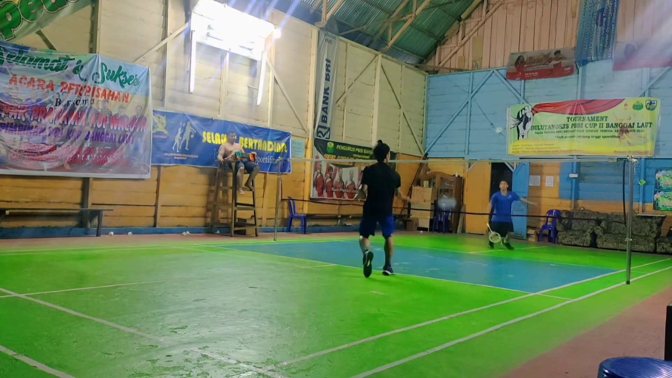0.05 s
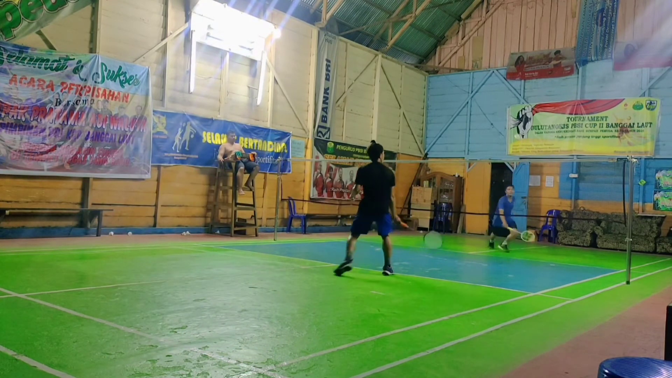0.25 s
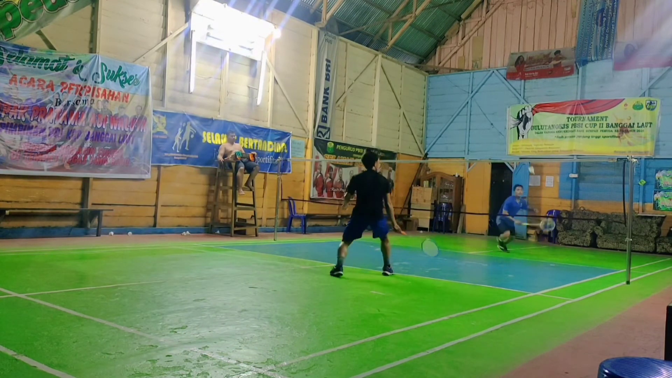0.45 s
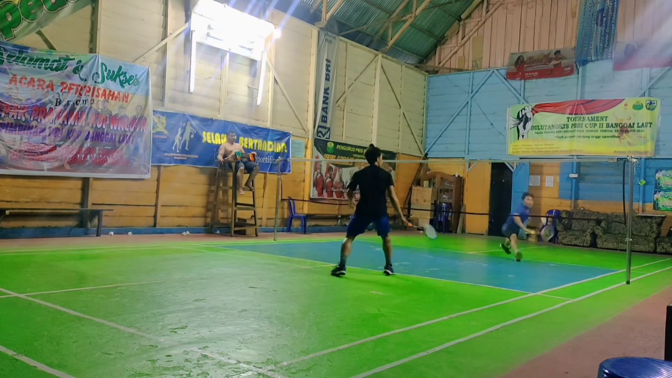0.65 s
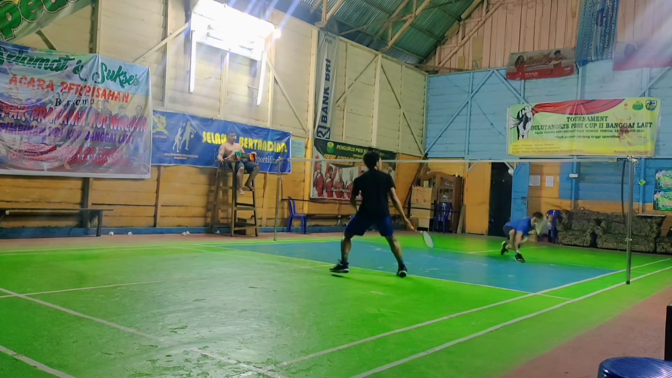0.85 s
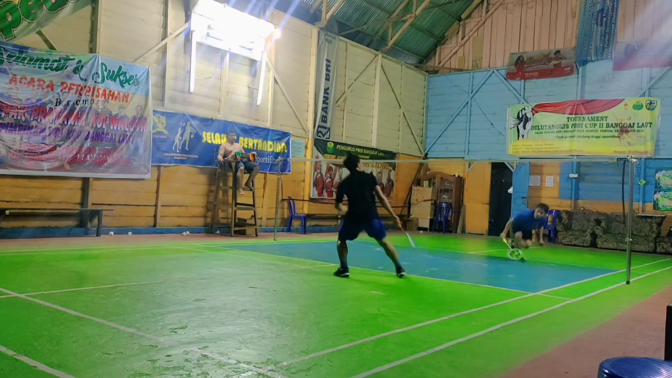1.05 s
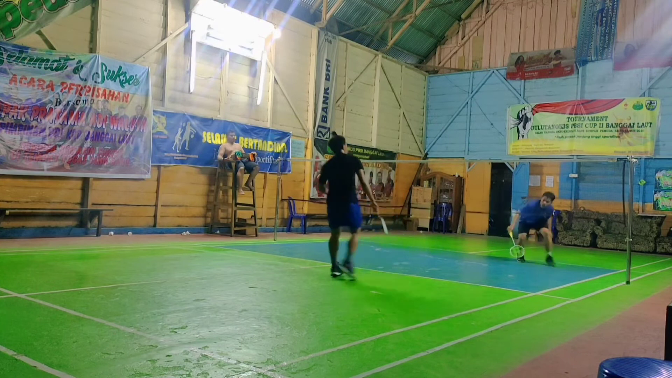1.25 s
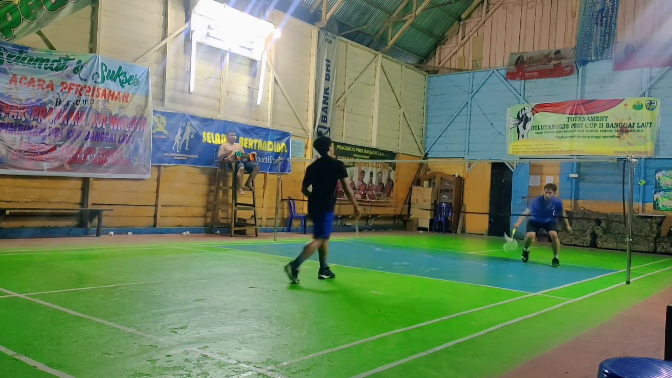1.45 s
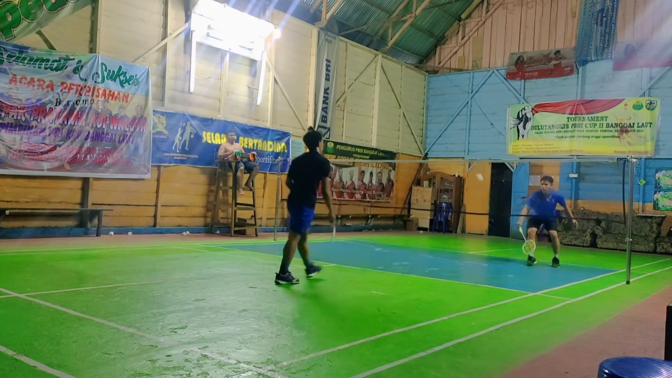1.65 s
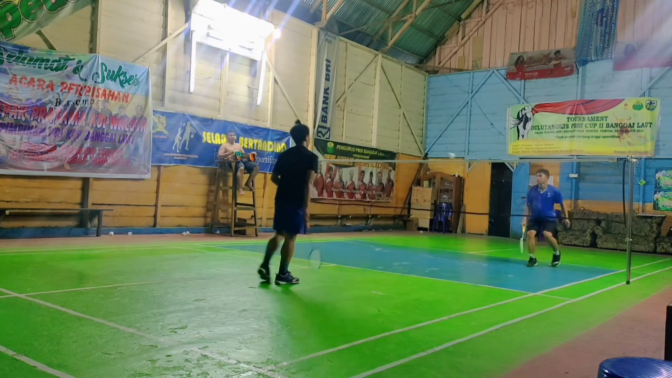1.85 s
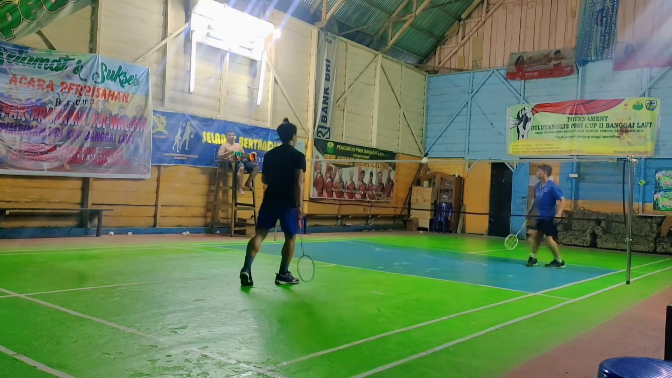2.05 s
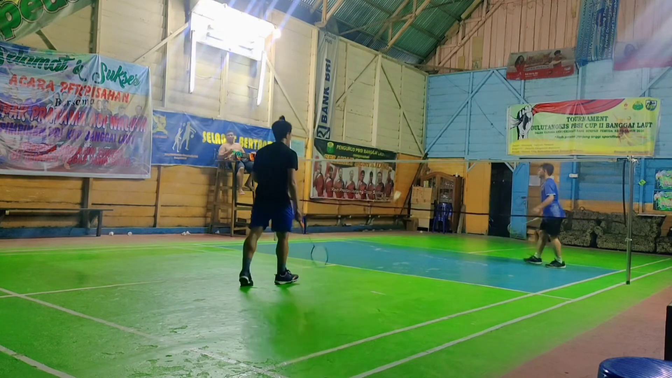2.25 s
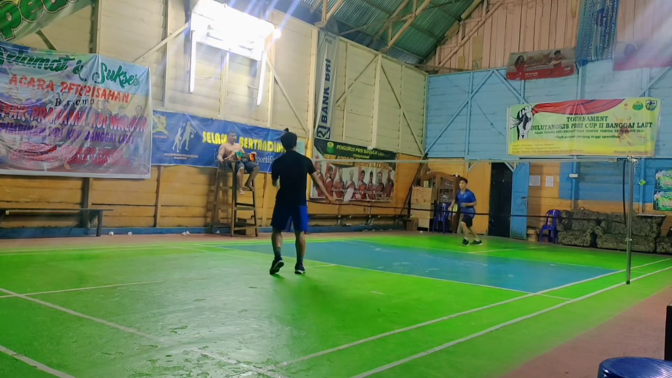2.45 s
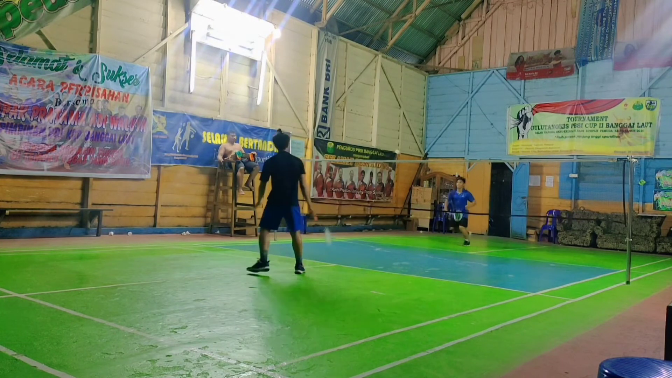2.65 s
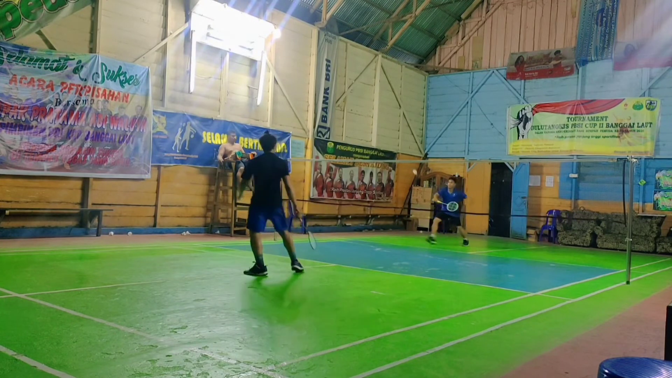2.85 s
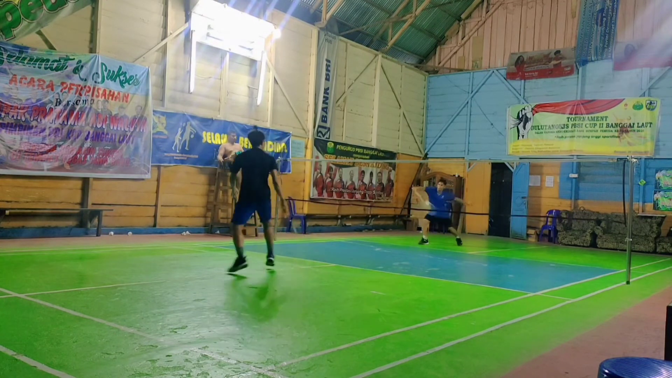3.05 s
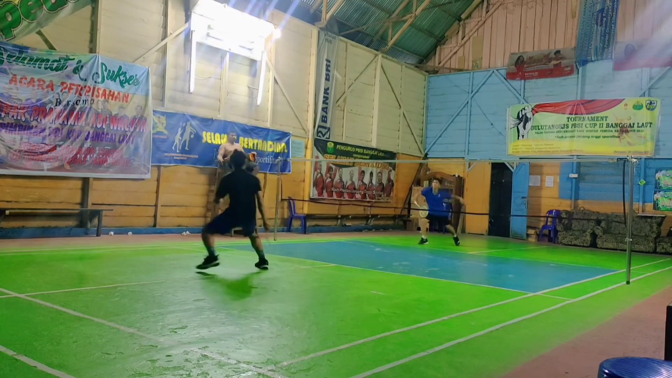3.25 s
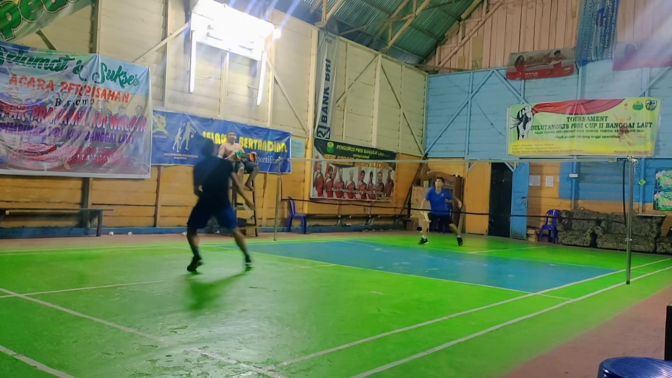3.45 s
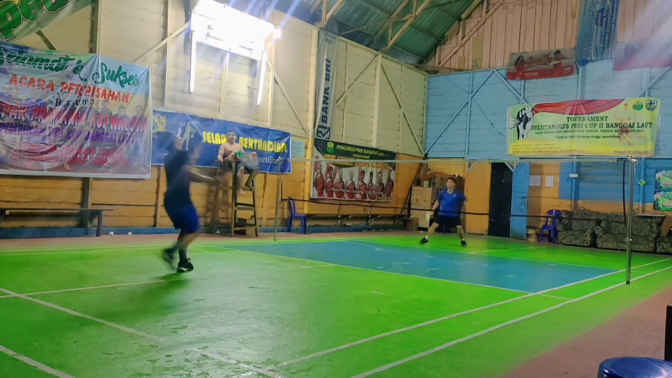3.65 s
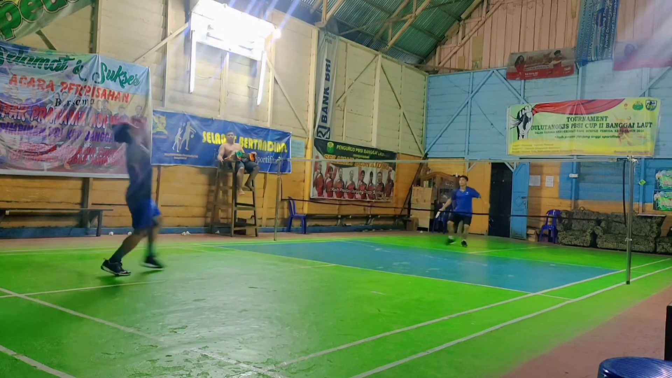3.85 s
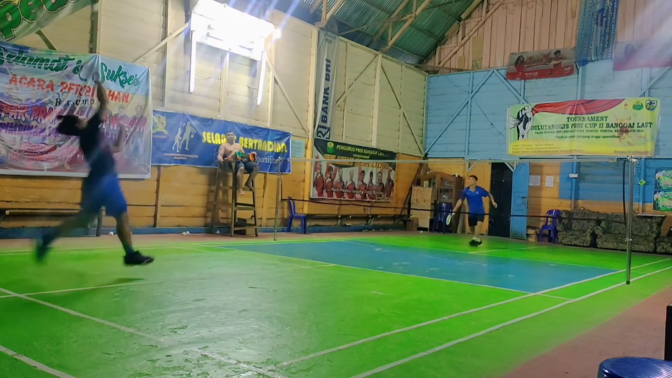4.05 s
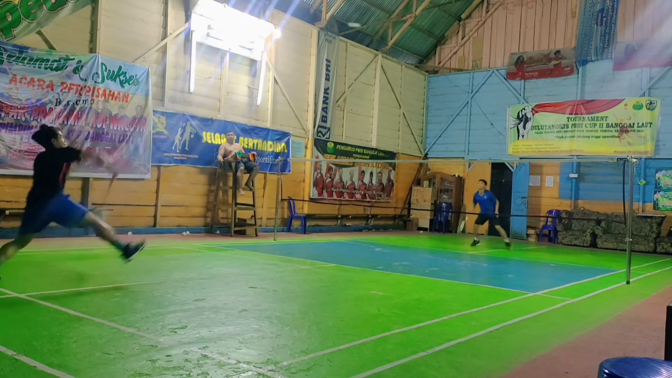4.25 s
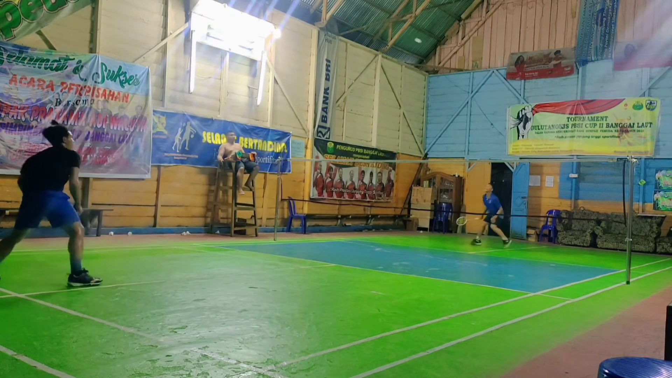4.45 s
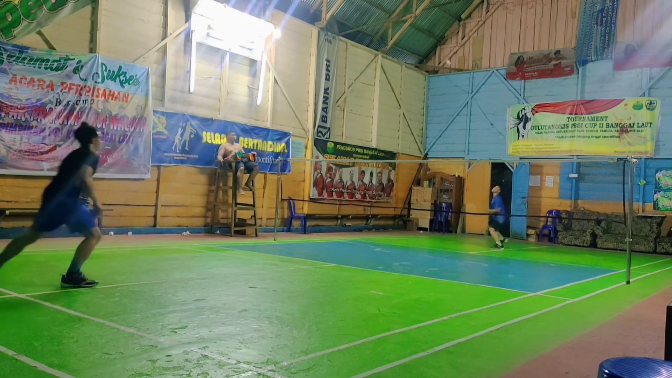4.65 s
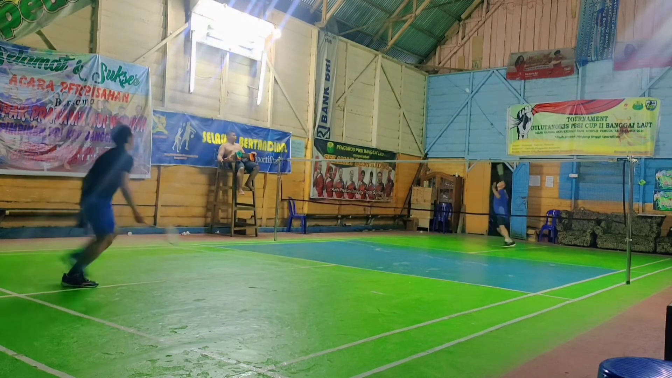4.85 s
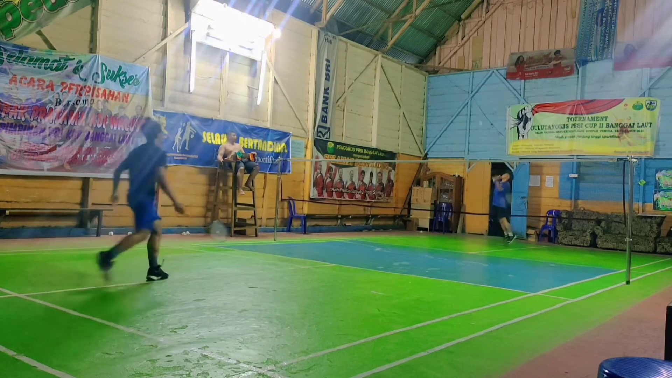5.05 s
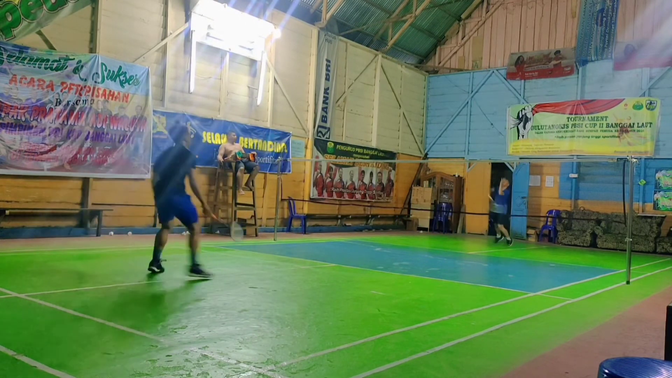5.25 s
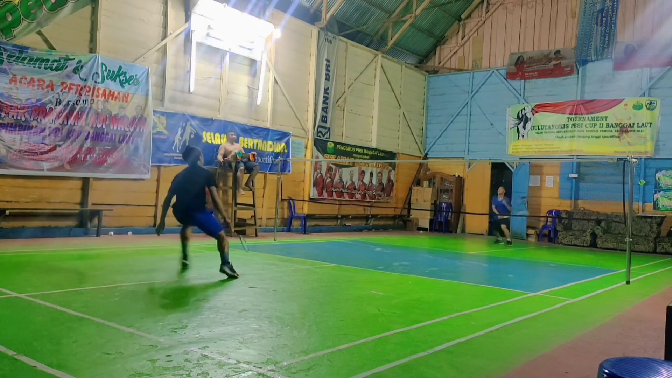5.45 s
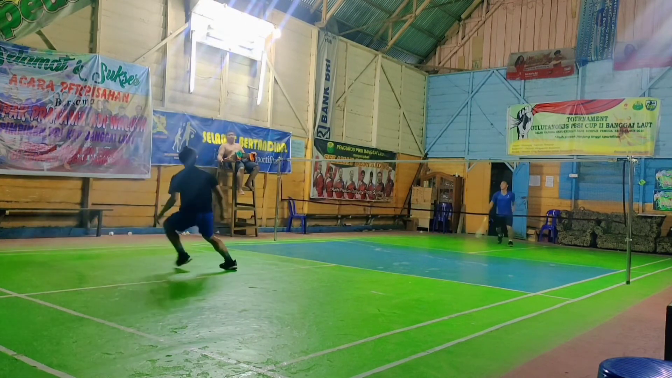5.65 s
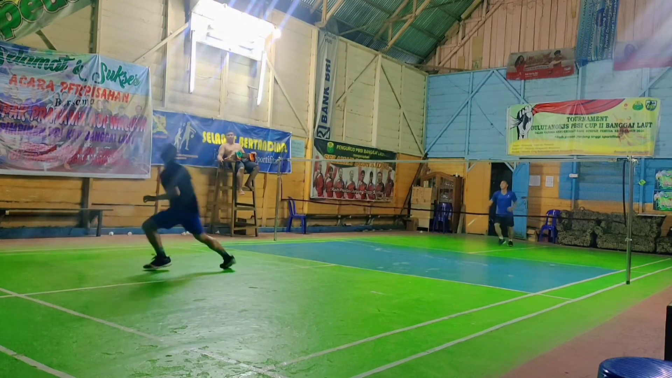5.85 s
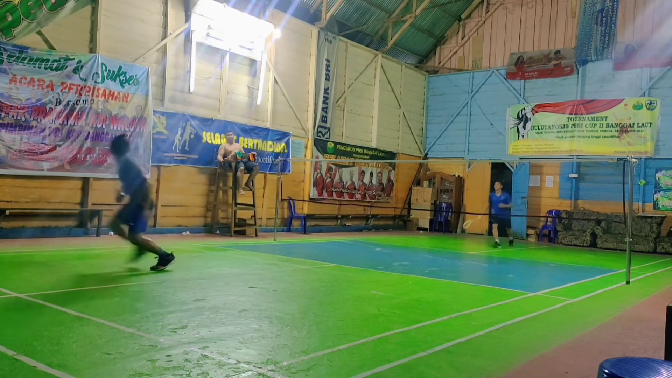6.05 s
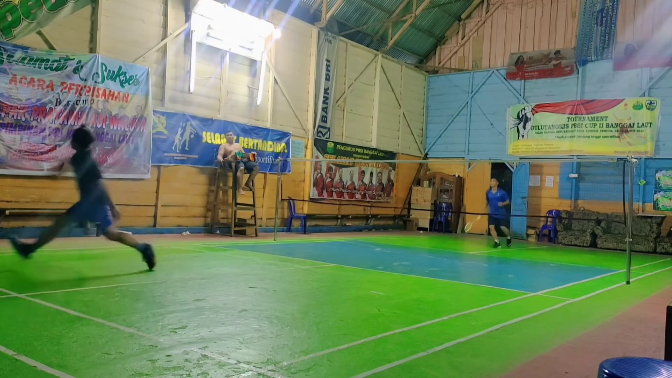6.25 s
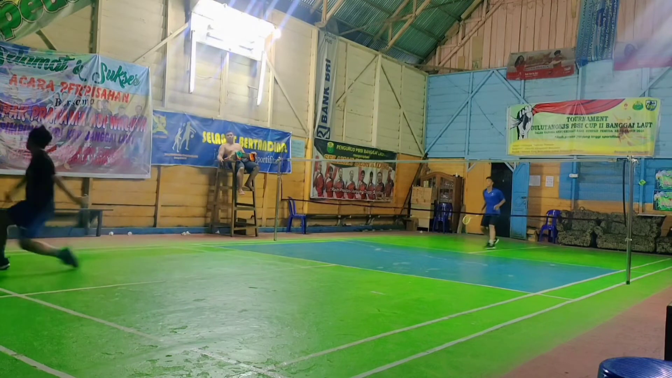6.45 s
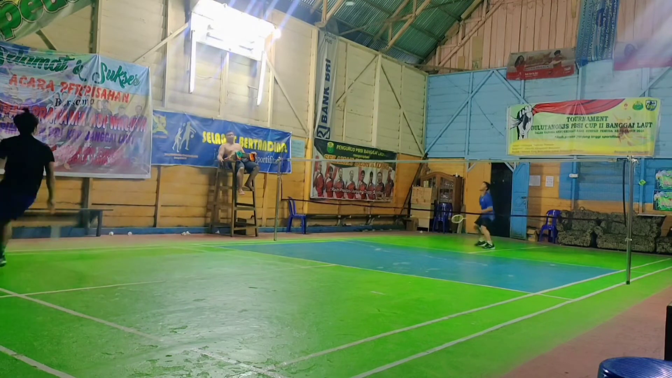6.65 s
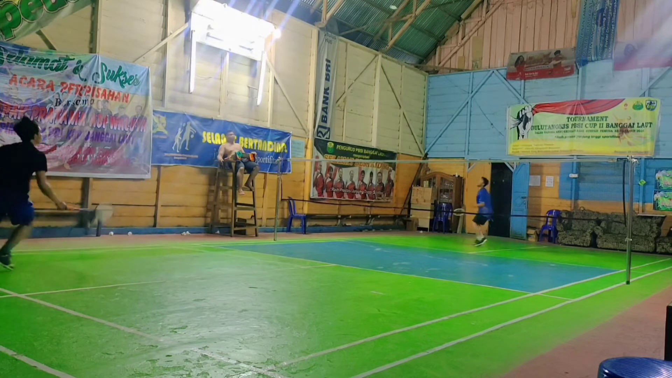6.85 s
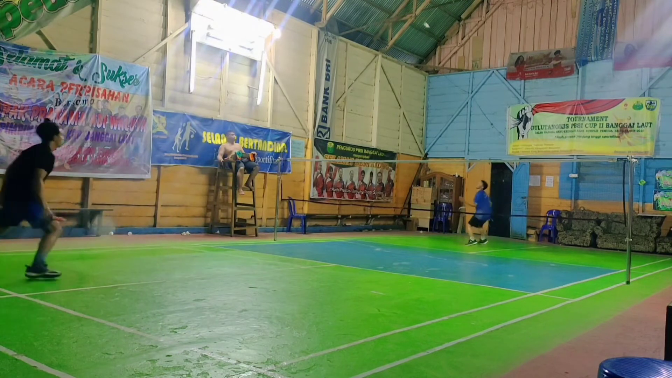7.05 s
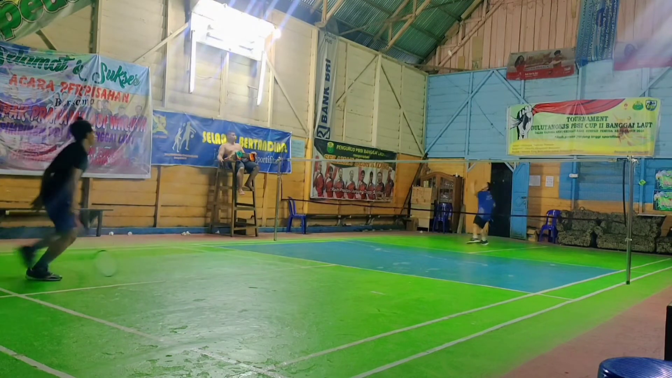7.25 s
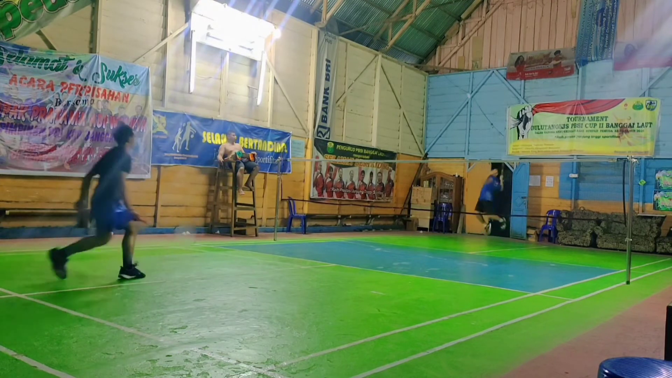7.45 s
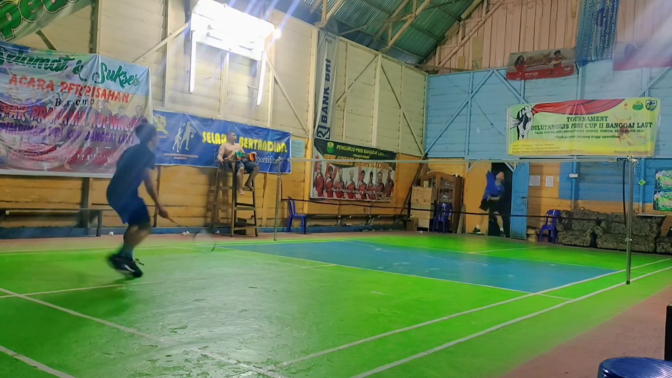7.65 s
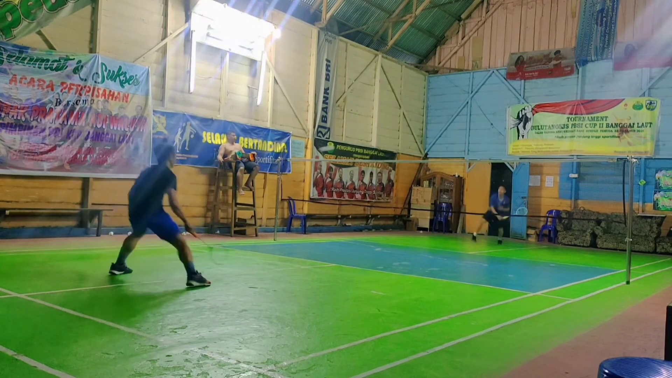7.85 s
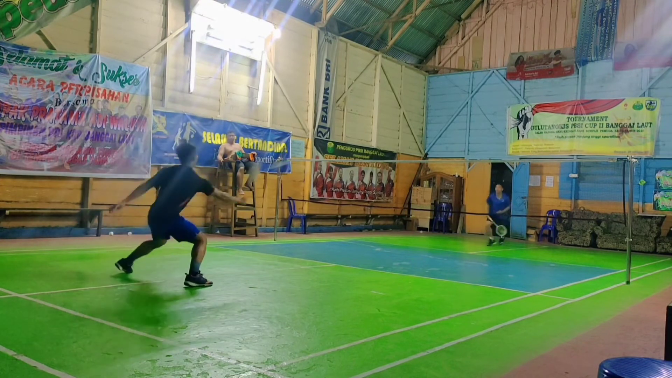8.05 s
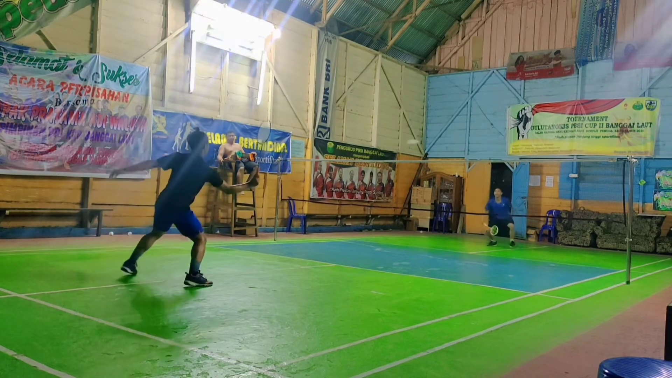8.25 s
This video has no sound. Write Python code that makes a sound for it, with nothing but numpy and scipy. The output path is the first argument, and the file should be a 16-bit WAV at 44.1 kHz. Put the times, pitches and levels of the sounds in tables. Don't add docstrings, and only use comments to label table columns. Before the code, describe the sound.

Badminton rackets crack against a shuttlecock in a large echoing hall, with sneaker squeaks, scuffs and footfalls over a faint fan hum.

```python
import sys
import numpy as np
from scipy import signal
from scipy.fft import rfft, irfft
from scipy.io import wavfile

SR = 44100
rng = np.random.default_rng(int(sys.argv[2]) if len(sys.argv) > 2 else 0)


def magnitude_from_level(level_db):
    exponent = np.asarray(level_db, float) / 20
    return 10 ** exponent


def materialize(psi):
    bounded = np.clip(np.atleast_2d(psi).T, -1, 1)
    quanta = np.round(bounded * 32767).astype(np.int16)
    wavfile.write(sys.argv[1], SR, quanta)


N = 366030
LEAD = SR


def rms_one(x):
    return x / np.sqrt(np.mean(x ** 2) + 1e-20)


def at_hz(points, hz):
    points = np.array(points)
    return np.interp(np.log(hz), np.log(points[:, 0]), points[:, 1])


def filtered(x, order, hz, kind="low"):
    return signal.sosfilt(signal.butter(order, hz, kind, fs=SR, output="sos"), x)


def one_click(size):
    return (np.arange(size) == 0) * 1.


def ring(clicks, hz, t60):
    r, w = magnitude_from_level(-60 / (t60 * SR)), 2 * np.pi * hz / SR
    return signal.lfilter([0, np.sin(w)], [1, -2 * r * np.cos(w), r * r], clicks + 1e-18)


def wobble(noise, hz, size):
    slow = rms_one(filtered(noise, 2, hz))[-size:]
    return slow - slow.mean()


def bands(size, gain_of_band):
    # pitch_hz, likeness (1 = same, 0 = unrelated)
    ear_likeness = [(100, 0.91), (250, 0.88), (500, 0.65), (1000, -0.15), (4000, 0.027), (12000, -0.074)]
    edges = 25 * 2 ** np.arange(0, 9.5, 1 / 3)
    white = rng.standard_normal((2, 2, size))
    out = 0
    for k, (low, high) in enumerate(zip(edges, edges[1:])):
        mid, side = filtered(white[k % 2], 2, [low, high], "band")
        hz = np.sqrt(low * high)
        alike = np.clip(at_hz(ear_likeness, hz), -1, 1)
        stereo = np.sqrt(1 + alike) * mid + np.sqrt(1 - alike) * side * [[1], [-1]]
        out = out + gain_of_band(hz) * stereo
    return out


def add(near, far, s, sound, hall_db, pan_db=0):
    ear_lag = 0.00006
    i = LEAD + round(s * SR)
    for ear, side in enumerate((0.5, -0.5)):
        j = i - round(side * pan_db * ear_lag * SR)
        near[ear, j:j + len(sound)] += sound[:len(far) - j] * magnitude_from_level(side * pan_db)
    far[i:i + len(sound)] += sound[:len(far) - i] * magnitude_from_level(hall_db)


def background():
    # pitch_hz, level_db (per Hz)
    air_colour = [(15, -61), (25, -15), (231, -24), (264, -6), (335, -15), (769, -19), (927, -17),
                  (1150, -19.5), (3010, -25.5), (3350, -39), (15000, -48)]
    # pitch_hz, level_db
    fans = [(199.2, -68), (220.7, -71.5), (263.8, -65), (306.8, -68)]
    air = magnitude_from_level(-60.5) * rms_one(bands(N, lambda hz: magnitude_from_level(at_hz(air_colour, hz))))
    for hz, db in fans:
        air += magnitude_from_level(db) * rms_one(ring(rng.standard_normal(N), hz, 2.16))
    return air


def hall(x):
    # pitch_hz, t60_s
    hall_t60 = [(80, 1.58), (250, 1.62), (600, 2.06), (1500, 2.43), (4000, 1.804), (8000, 1.43),
                (14000, 0.99)]
    # pitch_hz, level_db
    hall_colour = [(60, -2), (200, -2.5), (500, 6.5), (1200, -3.5), (3000, -1), (6000, -0.5), (14000, -8.5)]
    # delay_left_s, delay_right_s, level_db
    early_echoes = [(.0085, .009, -7), (0.0145, 0.0138, -12.5), (0.0186, .0182, -2.5), (0.0255, .026, -2.5),
                    (0.033, .034, -9), (.048, 0.05, -6.5)]
    t = np.arange(2 * SR) / SR
    tail = bands(len(t), lambda hz: magnitude_from_level(at_hz(hall_colour, hz) - 60 * t / at_hz(hall_t60, hz)))
    early = np.zeros_like(tail)
    for k, (left_s, right_s, db) in enumerate(early_echoes):
        early[[0, 1], [round(left_s * SR), round(right_s * SR)]] = (-1) ** k * magnitude_from_level(db)
    fill_s = 0.012
    response = filtered(early, 1, 2060) + tail * magnitude_from_level(-28) * (1 - np.exp(-t / fill_s))
    return signal.fftconvolve(response, x[None], axes=1)[:, :len(x)]


def thud(hz):
    t = np.arange(SR // 5) / SR
    return np.sin(2 * np.pi * hz * t) * (1 - np.exp(-t / 0.019)) * magnitude_from_level(-60 * t / 0.13)


def add_thuds(near, ends):
    # start_s, peak_db
    landings = [(0.027, -58), (0.273, -51), (0.729, -56), (0.821, -49.5), (1.199, -59), (1.318, -61),
                (1.74, -52.5), (3.447, -59), (3.711, -59.5), (3.919, -63.5), (4.867, -50), (5.046, -62),
                (5.599, -51.5), (6.198, -61), (6.421, -51), (6.851, -57), (6.979, -59), (7.205, -54.5)]
    for s, db in landings:
        add(near, ends[0], s, magnitude_from_level(db + 14) * thud(91.8), -15)


def footfall(hz):
    size = SR // 8
    t = np.arange(size) / SR
    sole = signal.lfilter([0.1], [1, -0.93], rng.standard_normal(size)) * magnitude_from_level(-60 * t / 0.02)
    return ring(one_click(size), hz, 0.021) + 3.6 * sole


def add_footfalls(near, ends):
    # start_s, peak_db, hall_db
    steps = [(0.206, -42, 1.5), (0.236, -47, 0), (0.416, -33.5, -5.5), (0.908, -38, 10.5),
             (1.918, -33, -11), (2.815, -59, -12), (3.073, -64, -10), (4.377, -20.5, -6),
             (4.454, -21.5, -8), (4.857, -29, -2.5), (5.393, -24.5, -4.5), (6.424, -26.5, 0),
             (6.621, -22, -5), (7.209, -31.5, -11), (7.316, -50, -20), (7.606, -58, 14.5)]
    for s, db, hall_db in steps:
        add(near, ends[1], s, magnitude_from_level(db - 10) * footfall(207), hall_db)


def scuff(length, low_hz):
    u = np.linspace(0, 1, round(length * SR))
    grit = rng.standard_normal(SR // 4)[:len(u)]
    swell = np.sin(np.pi * u ** 0.84)
    return signal.lfilter(*signal.butter(2, 11400, fs=SR), filtered(grit, 2, low_hz, "high") * swell)


def add_scuffs(near, ends):
    # start_s, length_s, level_db
    drags = [
        (-.15, 0.16, -55.5),
        (1.929, 0.24, -55),
        (3.612, 0.044, -48),
        (3.858, 0.066, -53),
        (4.13, 0.25, -50),
        (6.052, 0.043, -45),
        (6.432, 0.095, -47.5),
        (7.035, 0.026, -60),
    ]
    # start_s, length_s, level_db
    scuffs = [
        (0.395, 0.086, -56),
        (0.803, 0.088, -43.5),
        (1.46, 0.03, -40),
        (3, 0.23, -66),
        (5.058, 0.07, -40),
        (5.579, 0.011, -28.5),
        (5.59, 0.044, -29),
        (5.753, 0.028, -29),
        (6.842, 0.013, -45.5),
        (7.502, 0.019, -43),
    ]
    # start_s, length_s, level_db
    slaps = [
        (4.4549, 0.0012, -18),
        (4.4574, 0.0018, -16),
        (7.203, 0.016, -47),
        (7.515, 0.044, -40),
    ]
    for rows, low_hz, hall_db in ((drags, 4400, -6.5), (scuffs, 2680, -6.5), (slaps, 1000, -12)):
        for s, length, db in rows:
            add(near, ends[1], s, magnitude_from_level(db) * scuff(length, low_hz), hall_db, -1.5)


def squeak(length, first_hz, last_hz, octave_db):
    u = np.linspace(0, 1, round(length * SR))
    slow = rng.standard_normal((4, SR // 8))
    hz = (first_hz + (last_hz - first_hz) * u) * (1 + 0.024 * wobble(slow[0], 340, len(u)))
    phase = 2 * np.pi * np.cumsum(hz) / SR + 0.18 * wobble(slow[3], 1830, len(u))
    grip = magnitude_from_level(3.24 * wobble(slow[1], 380, len(u))) * np.sqrt(np.sin(np.pi * u ** 0.99))
    tone = np.sin(phase) + magnitude_from_level(octave_db) * np.sin(2 * phase) + magnitude_from_level(octave_db - 14) * np.sin(3 * phase)
    hiss = np.diff(slow[2])[:len(u)]
    return grip * (1.73 * tone + 0.04 * hiss)


def slip(length, first_hz, last_hz):
    above_khz = max((first_hz + last_hz) / 2 - 4310, 0) / 1000
    return squeak(length, first_hz, last_hz, 1 - 13.5 * above_khz)


def add_squeaks(near, ends):
    # start_s, length_s, first_hz, last_hz, level_db
    near_squeaks = [(0.419, 0.0067, 5640, 5900, -45.5), (0.842, .036, 5000, 4740, -47.5),
                    (1.446, .015, 4950, 4870, -45.5), (1.465, 0.021, 5040, 5440, -34.5),
                    (1.473, 0.012, 4325, 4700, -37.5), (3.238, 0.024, 4750, 4660, -42),
                    (3.283, 0.0055, 5400, 5200, -34), (3.632, 0.009, 5700, 5310, -42),
                    (5.07, 0.012, 5170, 5300, -42), (5.084, 0.013, 5260, 5190, -29),
                    (5.097, .013, 4780, 4430, -29.5), (5.102, 0.02, 4190, 4040, -45.5),
                    (5.107, .016, 3750, 3270, -34), (5.585, 0.027, 5400, 5760, -33),
                    (5.608, 0.0098, 4180, 4200, -41), (5.756, 0.013, 4140, 4400, -37.5),
                    (5.773, .011, 4845, 4890, -30), (6.874, 0.014, 5130, 4960, -47.5),
                    (7.513, 0.012, 4370, 4170, -35.5), (7.523, 0.015, 4500, 4270, -34.5),
                    (7.53, .014, 3750, 4070, -32.5), (7.544, 0.021, 4520, 4602, -24)]
    # start_s, length_s, first_hz, level_db
    far_squeaks = [
        (.868, 0.045, 4800, -64),
        (3.878, 0.014, 5750, -56),
        (4.488, 0.016, 5340, -40),
        (4.656, 0.044, 4820, -41.5),
        (5.379, 0.044, 4600, -45.5),
        (5.436, 0.031, 4870, -31.5),
        (5.499, 0.03, 4940, -50),
        (5.621, 0.06, 5700, -30.5),
        (7.031, 0.066, 4917, -39),
    ]
    for s, length, first_hz, last_hz, db in near_squeaks:
        add(near, ends[0], s, magnitude_from_level(db) * slip(length, first_hz, last_hz), -11, -3)
    for s, length, hz, db in far_squeaks:
        add(near, ends[1], s, magnitude_from_level(db) * slip(length, hz, hz * 1.015), -5.5, 1.5)


def swish(length, first_hz, last_hz):
    u = np.linspace(0, 1, round(length * SR))
    slow = rng.standard_normal((2, SR // 5))
    turns = np.cumsum(first_hz * (last_hz / first_hz) ** u) / SR
    rough = 0.75 + wobble(slow[0], 90, len(u)) + 1j * wobble(slow[1], 270, len(u))
    return np.real(rough * np.exp(2j * np.pi * turns)) * np.sin(np.pi * u ** 1.82 * 0.85)


def add_swishes(near, ends):
    # start_s, length_s, last_hz, level_db
    swings = [
        (0.783, 0.066, 641, -51.5),
        (4.147, 0.05, 1000, -41),
        (5.212, 0.18, 839, -47.5),
        (6.436, .045, 800.5, -48),
        (7.779, 0.1, 1140, -36.5),
    ]
    for s, length, last_hz, db in swings:
        add(near, ends[1], s, magnitude_from_level(db) * swish(length, last_hz / 2.1, last_hz), -6)


def tap():
    click = one_click(SR // 4)
    return ring(click, 930, 0.1) + 4.0 * ring(click, 360, 0.0026) + 11.0 * click


def add_taps(near, ends):
    # start_s, level_db
    soft_strokes = [
        (-.3, -57),
        (2.361, -60),
    ]
    for s, db in soft_strokes:
        add(near, ends[0], s, magnitude_from_level(db) * tap(), 8)


def strings(push_db):
    # pitch_hz, level_db, t60_s
    string_modes = [(985, -9.5, 0.087), (696, 3, 0.0086), (945, 6.5, 0.0047), (1570, -1.5, 0.012),
                    (1902, -1, 0.0079), (2870, 2.5, 0.0027)]
    click = one_click(SR // 5)
    body = magnitude_from_level(push_db) * ring(click, 331, 0.0077)
    for k, (hz, db, t60) in enumerate(string_modes):
        level = magnitude_from_level(db + rng.normal(0, 1))
        body = body + (-1) ** k * level * ring(click, hz, min(t60, 0.045))
    return 0.5 * filtered(body, 2, 147, "high")


def cork():
    t60_s, rise_s = 0.022, 0.0013
    t = np.arange(SR // 5) / SR
    burst = rfft(rng.standard_normal(len(t)) * magnitude_from_level(-60 * t / t60_s))
    size = np.abs(burst)
    even = irfft(burst / (size + 0.042 * size.mean()), len(t)) * magnitude_from_level(-60 * t / (3 * t60_s))
    return filtered(even, 1, 2000, "high") * (1 - np.exp(-t / rise_s))


def struck(db, push_db, end):
    # delay_s, level_db
    wall_echoes = [
        [(.0335, -9), (.038, -14)],
        [(.014, -7.5), (.0188, -4.5), (.0255, -4)],
    ]
    crack_db = 19.5 - 0.2 * push_db
    blow = strings(push_db) - magnitude_from_level(crack_db) * cork()
    upper_modes = signal.lfilter(*signal.iirpeak(1940, 1.5, fs=SR), blow)
    blow = blow + (magnitude_from_level(0.17 * (db + 18)) - 1) * upper_modes
    face_hz = 530
    face_ring = ring(one_click(len(blow)), face_hz, 0.0069)
    aimed = magnitude_from_level(push_db + 3) * np.gradient(face_ring) * SR / (2 * np.pi * face_hz)
    aimed = filtered(aimed, 2, 900)
    dull = filtered(blow + aimed, 1, 2500)
    echoes = 0
    for s, loss_db in [(0.0045, -1.5), *wall_echoes[end]]:
        echoes = echoes + magnitude_from_level(loss_db) * np.pad(dull, (round(s * SR), 0))[:len(dull)]
    return magnitude_from_level(db) * blow, magnitude_from_level(db) * (aimed + echoes)


def add_hits(near, ends):
    # start_s, ring_db, push_db (re ring), hall_db, pan_db (left over right)
    hits = [
        (0.8845, -18, 0.5, -0.5, 3.5),
        (3.2006, -27.5, 5.5, 2.5, -3),
        (4.201, -11.5, -1.5, -2.5, -3.5),
        (5.2888, -12, 0, -2, 2),
        (6.489, -20.5, -3.5, 3, 6.5),
        (7.8144, -6.5, -0.5, -2.5, 2),
    ]
    for k, (s, db, push_db, hall_db, pan_db) in enumerate(hits):
        end = k % 2
        blow, aimed = struck(db, push_db, end)
        add(near, ends[end], s + 0.000982, blow, hall_db, pan_db)
        add(near, ends[end], s + 0.000982, aimed, -np.inf, pan_db)


def scene():
    near, ends = np.zeros((2, LEAD + N)), np.zeros((2, LEAD + N))
    for add_layer in (add_thuds, add_footfalls, add_scuffs, add_squeaks, add_swishes, add_taps, add_hits):
        add_layer(near, ends)
    return (near + hall(ends[0]) + hall(ends[1]))[:, LEAD:] + background()


def top_cut(x):
    return signal.sosfilt(signal.butter(12, 16480, fs=SR, output="sos"), x)


def record(dry):
    # pitch_hz, width_hz, level_db
    treble_bands = [(3750, 1070, -3), (8480, 1380, 6.5), (14500, 1100, 10)]
    t = np.arange(N) / SR
    dip_s, dip_width_s, dip_db = 2.352, 0.008, -9
    dry = dry * magnitude_from_level(dip_db * np.exp(-((t - dip_s) / dip_width_s) ** 2))
    for hz, width_hz, db in treble_bands:
        b, a = signal.iirpeak(hz, hz / width_hz, fs=SR)
        dry = dry + (magnitude_from_level(db) - 1) * signal.lfilter(b, a, dry)
    dry = filtered(dry, 2, 70, "high")
    dry = filtered(dry, 2, 9860)
    mix = signal.sosfilt(signal.cheby2(12, 60, 16300, fs=SR, output="sos"), dry)
    return top_cut(mix)


dry = scene()
out = record(dry)
materialize(out)
```